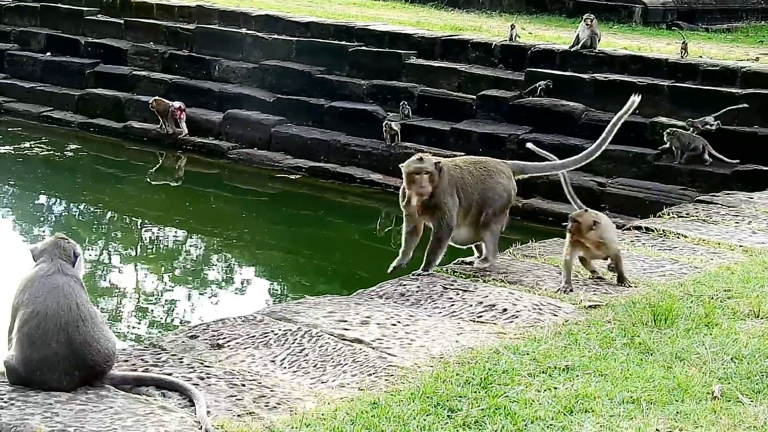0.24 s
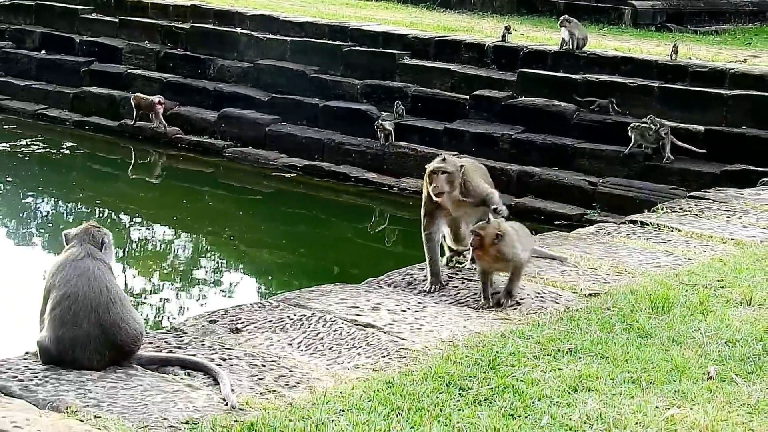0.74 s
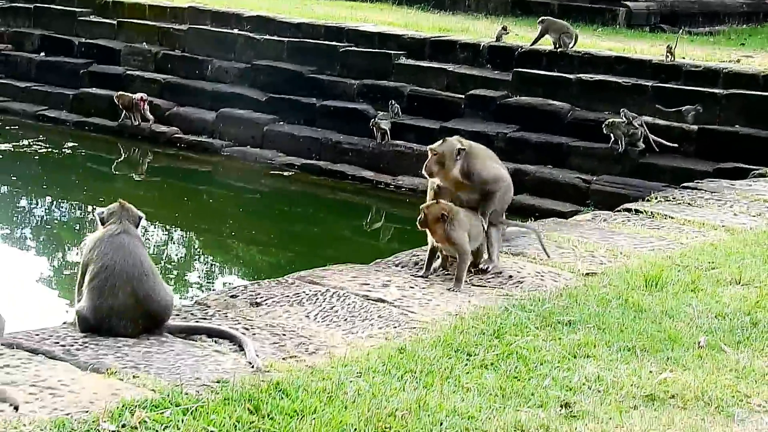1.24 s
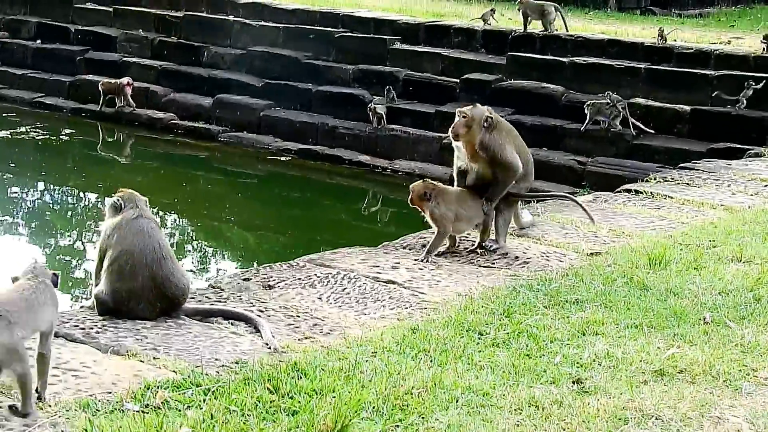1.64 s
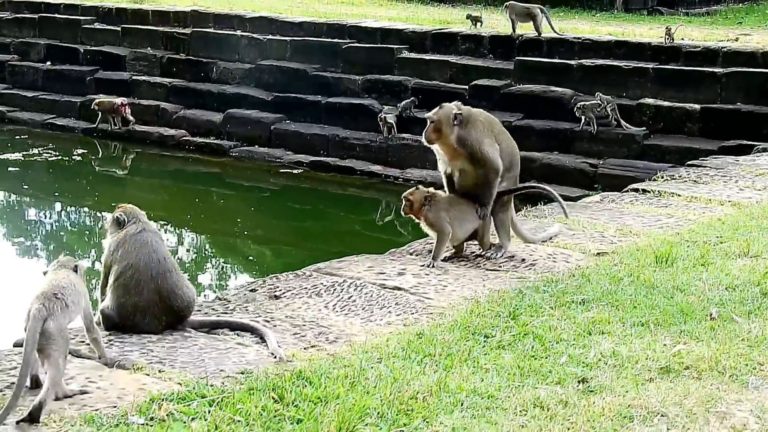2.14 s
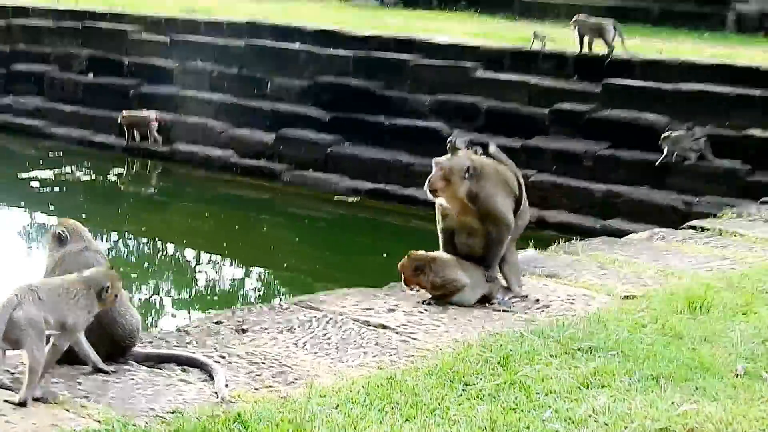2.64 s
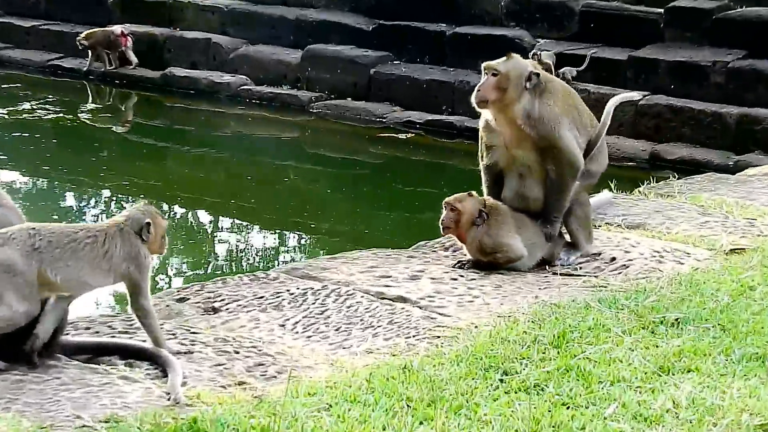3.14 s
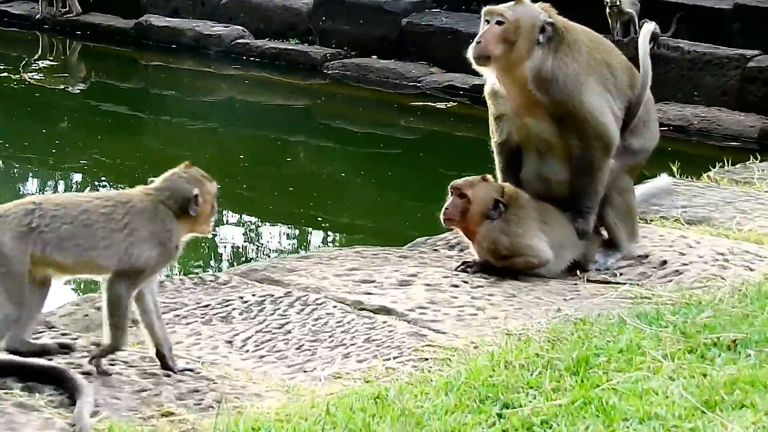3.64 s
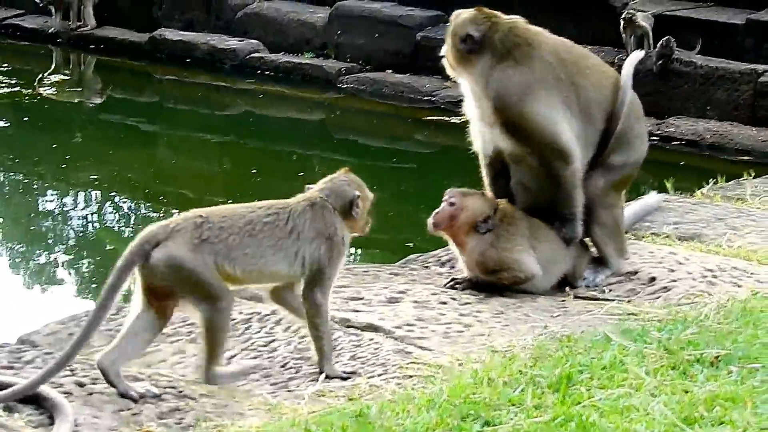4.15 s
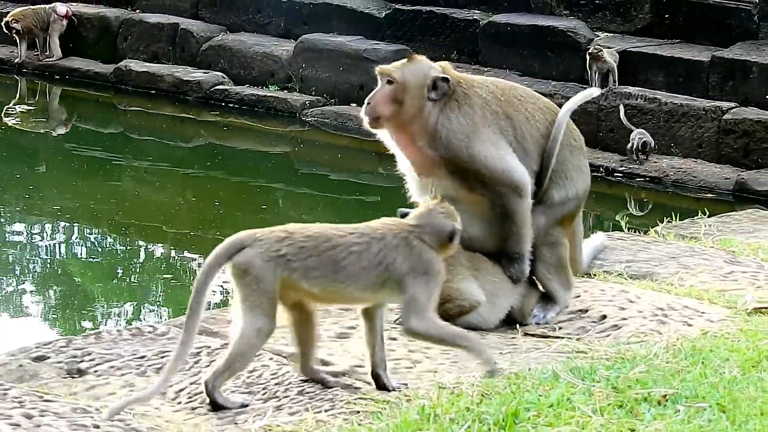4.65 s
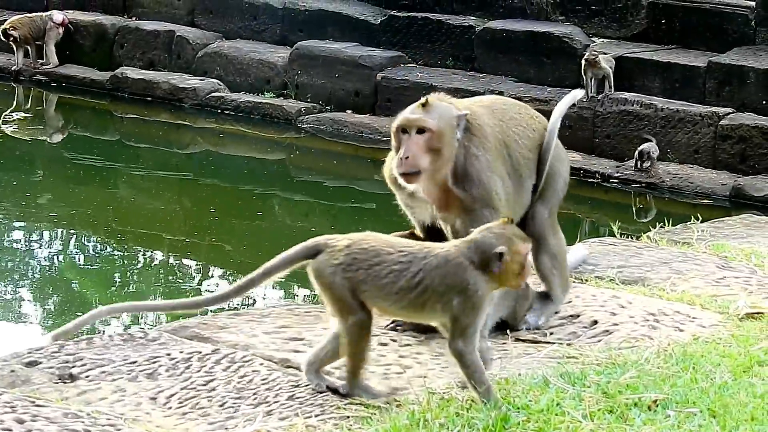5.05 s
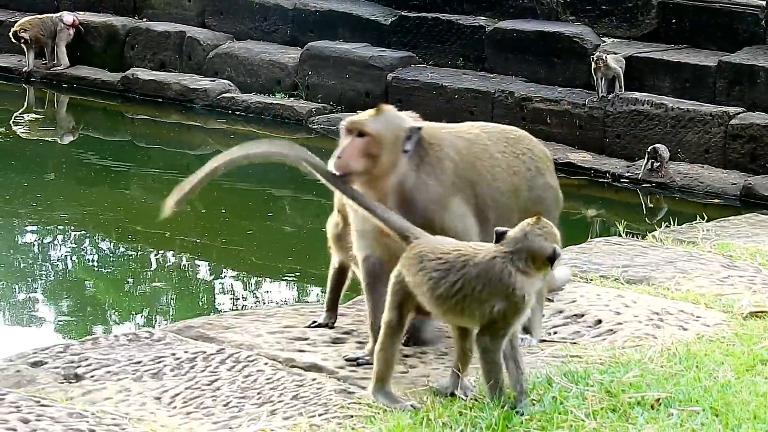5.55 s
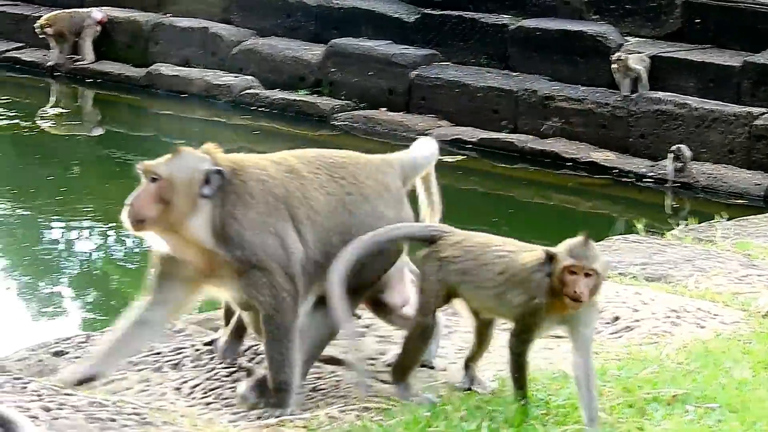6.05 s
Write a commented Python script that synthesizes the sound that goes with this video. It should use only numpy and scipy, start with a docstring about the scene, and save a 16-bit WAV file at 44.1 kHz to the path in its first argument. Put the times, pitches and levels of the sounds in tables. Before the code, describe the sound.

Piercing monkey shrieks break from clear whistles into raspy chaos outdoors, with gruff grunts between them and a faint echo off stone steps.

```python
"""A young macaque, held down by an adult on the stone rim of a pond, screams in bouts, close to dead ahead.
Its voice jumps between near-pure whistles and sliding squeals, both sums of gliding harmonics,
and harsh chaos, made of two torn noise bands; longer cries follow drawn contours of pitch and level.
Other macaques grunt, in noisy puffs over a chest rumble, and coo softly.
Paving nearby scatters the sound, and stone steps across the water send a faint echo back."""
import sys
import numpy as np
from scipy import signal
from scipy.fft import rfft, irfft, next_fast_len
from scipy.io import wavfile
from scipy.ndimage import uniform_filter1d, map_coordinates

SR = 44100
rng = np.random.default_rng(int(sys.argv[2]) if len(sys.argv) > 2 else 0)


def waveform_to_disk(signal):
    """Save audio, clipped to [-1, 1], as 16-bit WAV at the path in sys.argv[1]."""
    frames = np.transpose(np.atleast_2d(signal))
    scaled = np.clip(frames, -1, 1) * 32767
    samples = np.round(scaled).astype(np.int16)
    wavfile.write(sys.argv[1], SR, samples)


N = 276948
TIME = np.arange(N) / SR  # s
TOP_HZ = 15760  # upper limit of the microphone
CLEAN, ROUGH = 0.007, 0.04  # fast pitch shake of clear and of rough voices, as a share of the pitch
JITTER_RATE = 1800  # knots of that shake per second
EDGE_SHARE = 0.16  # softness of the edges of notes, cries and screams, as a share of their length


def amp(db):
    """Decibels to gain."""
    return 10 ** (np.asarray(db) / 20)


def unit(x):
    """Scale to rms 1."""
    return x / np.sqrt(np.mean(x ** 2) + 1e-20)


def along(points, hz):
    """Read (frequency [Hz], value) points on a log frequency axis."""
    f, v = np.transpose(points)
    return np.interp(np.log(hz + 1), np.log(f), v)


def wobble(rate, n=N):
    """A smooth random curve with rate knots a second."""
    knots = rng.standard_normal(int(n * rate / SR) + 4)
    return map_coordinates(knots, [np.arange(n) * rate / SR])


def filtered(x, response):
    """Multiply the spectrum of x by a response of frequency."""
    m = next_fast_len(N + SR // 4)
    return irfft(rfft(x, m) * response(np.fft.rfftfreq(m, 1 / SR)), m)[..., :N]


def noise(spectrum):
    """Noise of rms 1, coloured by (frequency [Hz], level [dB]) points."""
    return unit(filtered(rng.standard_normal(N), lambda hz: amp(along(spectrum, hz))))


def voice(pitch, tilt_db, jitter):
    """Harmonics of a shaking pitch through the throat; the more it shakes, the more its strength flutters."""
    # resonances of the throat: (frequency [Hz], level [dB])
    throat = [(400, -19), (1000, -9), (2100, -1), (2700, -12), (3300, -6), (4250, -14), (6100, 2),
              (8000, -7), (10500, -30), (15000, -46)]
    n = len(pitch)
    shake = 0.008 * wobble(60, n) + jitter * wobble(JITTER_RATE, n)
    phase = 2 * np.pi * np.cumsum(pitch * (1 + shake)) / SR
    order = np.arange(1, int(TOP_HZ / pitch.min()) + 2)[:, None]
    # every harmonic drifts in level on its own
    drift_db = 4.5 * np.array([wobble(35, n) for k in order])
    harmonic_hz = order * pitch
    weight = amp(along(throat, harmonic_hz) + tilt_db * np.log2(order) + drift_db)
    weight = weight * (harmonic_hz < SR / 2)
    start_phase = rng.uniform(0, 2 * np.pi, order.shape)
    wave = np.sum(weight * np.sin(order * phase + start_phase), 0)
    even_wave = wave / np.sqrt(np.sum(weight ** 2, 0) / 2)
    flutter_db = 2 * wobble(100, n) + 35 * jitter * wobble(JITTER_RATE / 2, n)
    return even_wave * amp(flutter_db)


def note(row, tilt_db, jitter):
    """One short note: the pitch glides along an arch while the level swells and sinks."""
    arch_octaves = 0.018  # upward bow of the pitch in mid-glide
    swell_db, crest = 4.5, 0.25  # climb to the peak and equal fall; place of the peak as a share of length
    start, length, first_hz, last_hz, peak_db = row
    # soft edges reach half a length beyond either end
    span = slice(*np.searchsorted(TIME, [start - length / 2, start + length + length / 2]))
    u = (TIME[span] - start) / length
    inside = np.clip(u, 0, 1)
    outside = np.abs(u - inside)
    # beyond the ends the glide goes on at half speed
    glide = first_hz * (last_hz / first_hz) ** ((u + inside) / 2)
    pitch = glide * 2 ** (arch_octaves * (1 - (2 * inside - 1) ** 2))
    level_db = peak_db - swell_db * np.interp(u, [0, crest, 1], [1, 0, 1]) ** 2
    fade = np.exp(-outside / EDGE_SHARE) * (1 - 2 * outside) ** 2
    out = np.zeros(N)
    out[span] = voice(pitch, tilt_db, jitter) * fade * amp(level_db)
    return out


def whistles(tilt_db=-14):
    """Tight vocal folds give an almost pure tone; tilt_db is per octave."""
    # whistled notes: (start [s], length [s], first pitch [Hz], last pitch [Hz], peak level [dB])
    whistle_notes = [(0.019, 0.2, 5990, 5400, -34), (0.232, 0.066, 5510, 4990, -27.5),
                     (0.309, 0.035, 4620, 4010, -25.5), (0.33, 0.021, 1930, 2080, -33.5),
                     (0.454, 0.0075, 6030, 7000, -28), (0.523, 0.028, 7670, 8230, -27.5),
                     (0.657, 0.022, 5100, 4800, -27), (0.66, 0.029, 2800, 2150, -35.5),
                     (0.783, 0.0055, 1928, 2210, -19), (0.827, 0.075, 5950, 5610, -25),
                     (1.428, 0.045, 6450, 5700, -28), (1.486, 0.051, 6980, 6430, -24.5),
                     (1.549, 0.23, 4830, 4560, -50.5), (1.769, 0.029, 1235, 2540, -41.5),
                     (1.923, 0.058, 6400, 5400, -43), (2.068, 0.53, 4790, 4680, -58.5),
                     (2.427, 0.044, 5450, 4260, -40.5), (2.839, 0.073, 6630, 6350, -22.5),
                     (2.929, 0.025, 6620, 5800, -24.5), (3.204, 0.041, 7050, 6270, -23.5),
                     (3.291, 0.077, 5850, 5300, -26.5), (3.405, 0.068, 2147, 2020, -24.5),
                     (2.321, 0.025, 3580, 3550, -43), (4.193, 0.0098, 5035, 5460, -24.5)]
    return sum(note(row, tilt_db, CLEAN) for row in whistle_notes)


def grunts(rate=80, scatter=0.72):
    """Slack folds flap unevenly; each noisy puff rings the muzzle over a low chest rumble."""
    # pulsed grunts: (start [s], length [s], muzzle level [dB], chest level [dB])
    grunt_calls = [(0.064, 0.26, -43.5, -49.5), (1.268, 0.13, -38.5, -43), (1.576, 0.55, -48, -51),
                   (2.658, 0.16, -33, -51), (2.913, 0.05, -35.5, -62.5), (3.284, 0.03, -35, -72.5),
                   (4.18, 0.14, -41, -53.5), (5.022, 0.15, -59, -74.5), (5.833, 0.19, -33.5, -45.5)]
    # resonances of the muzzle: (frequency [Hz], level [dB])
    muzzle = [(500, -16), (1050, -0.5), (1500, 7.5), (2750, -20.5), (3550, -6), (4600, -18.5),
              (6400, -13.5), (14000, -65)]
    # colour of the chest rumble: (frequency [Hz], level [dB])
    chest_colour = [(35, -39), (150, -10), (2500, -52.5)]
    pulse_decay_s, leak = 0.0035, 0.3  # the leak is air that flows between puffs
    flap_hz = rate * np.exp(scatter * wobble(rate))
    cycles = np.floor(np.cumsum(flap_hz) / SR)
    flaps = np.diff(cycles, prepend=0) * amp(5.7 * wobble(rate))
    puffs = signal.lfilter([1], [1, -np.exp(-1 / (pulse_decay_s * SR))], flaps) + leak
    breath = puffs * rng.standard_normal(N)
    rung = unit(filtered(breath, lambda hz: amp(along(muzzle, hz))))
    rumble, out = noise(chest_colour), np.zeros(N)
    for start, length, db, chest_db in grunt_calls:
        # the push of air builds quickly and sags away
        span = slice(*np.searchsorted(TIME, [start, start + 2 * length]))
        age = (TIME[span] - start) / length
        swell = (1 - np.exp(-6 * age)) ** 2 / (1 + age ** 10)
        out[span] += swell * (amp(db) * rung[span] + amp(chest_db) * rumble[span])
    return out


def squeals():
    """Rough notes sweep their harmonics through the throat."""
    # (start [s], length [s], first pitch [Hz], last pitch [Hz], peak level [dB], tilt [dB per octave])
    squeal_notes = [(0.303, 0.038, 952, 1235, -37.5, -3), (0.573, 0.028, 2570, 1706, -27.5, 2),
                    (0.754, 0.023, 1550, 1882, -27.5, -1), (0.789, 0.01, 1978, 2410, -22.5, 2),
                    (0.956, 0.049, 2844, 1590, -30.5, 0), (1.535, 0.089, 2335, 1943, -34, 8),
                    (2.009, 0.066, 3043, 1698, -45, -11), (2.964, 0.045, 2760, 2830, -33.5, -8),
                    (3.097, 0.026, 1290, 2357, -26.5, -14), (3.133, 0.1, 2446, 2570, -31.5, 3),
                    (3.94, 0.054, 3357, 3010, -32.5, -10.5), (3.963, 0.021, 2227, 3273, -21, 7),
                    (4.669, 0.041, 3910, 4190, -44.5, -8.5), (4.719, 0.03, 3785, 3160, -42.5, -22.5),
                    (6.175, 0.12, 468.4, 510.7, -43.5, -10.5)]
    return sum(note(row, tilt_db, ROUGH) for *row, tilt_db in squeal_notes)


def spell(start, length):
    """The folds tip into chaos, stay there, and settle quickly; long spells set in more gently."""
    attack_s, release_s = 0.0017 + EDGE_SHARE * length, 0.014
    span = slice(*np.searchsorted(TIME, [start, start + length + 10 * release_s]))
    age = TIME[span] - start
    out = np.zeros(N)
    out[span] = (1 - np.exp(-age / attack_s)) * np.exp(-np.maximum(age - length, 0) / release_s)
    return out


def chaos(flutter_db=1.0):
    """The folds lose their rhythm: a shrill band slides with throat tension over lurching low partials."""
    # spells of chaotic screaming: (start [s], length [s], shrill level [dB], low rasp level [dB])
    screams = [(0.303, 0.054, -42, -28), (0.367, 0.11, -41, -37), (0.493, 0.08, -29.5, -40),
               (0.575, 0.3, -35, -45.5), (0.757, 0.041, -37, -28), (0.816, 0.13, -38.5, -41.5),
               (0.922, 0.14, -30, -48), (0.967, 0.49, -32.5, -60), (1.45, 0.19, -51, -41.5),
               (1.993, 0.051, -60, -36.5), (2.235, 0.38, -60.5, -59.5), (2.721, 0.12, -43, -46),
               (3.037, 0.06, -29.5, -42), (3.101, 0.02, -23.5, -30.5), (3.117, 0.15, -37.5, -44.5),
               (3.298, 0.055, -33.5, -42.5), (3.355, 0.066, -26, -48.5), (3.464, 0.018, -30, -52.5),
               (3.561, 0.37, -67, -60.5), (3.958, 0.0047, -25.5, -32.5), (4.107, 0.078, -28, -45),
               (4.545, 0.084, -48, -57.5), (5.673, 0.15, -51, -82), (6.171, 0.079, -63, -43.5)]
    # centre of the shrill band, which rises as the throat tightens: (time [s], frequency [Hz])
    tension = [(0.33, 6699), (0.55, 7376), (1.0, 6530), (1.33, 7197), (2.0, 6425), (3.2, 7060),
               (4.17, 5944), (4.6, 7055), (5.75, 7750)]
    # shrill band at the resting tension: (frequency [Hz], level [dB])
    shrill = [(4300, -40.5), (5900, -8), (6600, 6), (7600, 4), (8600, -12.5), (14000, -43)]
    # low rasp before it lurches: (frequency [Hz], level [dB])
    rasp = [(350, -33.5), (2000, 3.5), (2650, -2), (3500, 9.5), (4300, -11), (5200, 9), (13000, -51)]
    rest_hz, patchy_db, lurch = 7000, 6, 0.14
    shrill_speed = np.interp(TIME, *np.transpose(tension)) / rest_hz * np.exp(ROUGH / 2 * wobble(60))
    rasp_speed = np.exp(lurch * wobble(35))
    powers = sum(np.outer(amp(levels_db) ** 2, spell(start, length) ** 2)
                 for start, length, *levels_db in screams)
    gains = np.sqrt(powers)
    out = 0
    for band, speed, gain in zip((shrill, rasp), (shrill_speed, rasp_speed), gains):
        z = signal.stft(noise(band), nperseg=256)[2]
        # each smeared partial is a few hundred hertz wide and lives some tens of milliseconds
        patches = uniform_filter1d(rng.standard_normal(z.shape), size=2, axis=0)
        patches = uniform_filter1d(patches, size=12, axis=1)
        torn = signal.istft(z * amp(patchy_db * unit(patches)), nperseg=256)[1]
        # reading the noise faster or slower slides its pitch
        sliding = map_coordinates(torn, [np.cumsum(speed)], mode="wrap")
        # the air supply holds the power of each band steady
        power = np.abs(uniform_filter1d(sliding ** 2, size=700))
        out = out + gain * sliding / np.sqrt(power)
    return out * unit(amp(flutter_db * (wobble(110) + wobble(700))))


def coos(tilt_db=-26):
    """Rounded lips leave mostly a husky fundamental; tilt_db is per octave."""
    # soft coos: (start [s], length [s], first pitch [Hz], last pitch [Hz], peak level [dB])
    coo_notes = [(3.873, 0.063, 943, 672, -44), (4.621, 0.074, 960, 911, -45),
                 (5.506, 0.068, 1000, 647, -54)]
    return sum(note(row, tilt_db, 2 * ROUGH) for row in coo_notes)


def cry(contour, tilt_db, jitter):
    """One long call that follows its contour of pitch and level, with rounded pitch corners and soft ends."""
    s, hz, db = np.transpose(contour)
    span = slice(*np.searchsorted(TIME, [s[0], s[-1]]))
    pitch = uniform_filter1d(np.interp(TIME[span], s, hz), size=500)
    level = amp(np.interp(TIME[span], s, db))
    ends = signal.windows.tukey(len(pitch), EDGE_SHARE)
    out = np.zeros(N)
    out[span] = voice(pitch, tilt_db, jitter) * level * ends
    return out


def cries(shriek_db=3, yelp_db=2, low_db=-10, moan_db=-30):
    """Pressed folds tilt shriek and yelp bright, slack ones the low call and moan soft (dB per octave)."""
    # contours of the drawn-out cries: (time [s], pitch [Hz], level [dB])
    shriek = [(3.98, 3125, -23.5), (4.02, 3142, -22.5), (4.045, 2926, -30), (4.054, 3170, -38.5),
              (4.1, 2994, -41)]
    low_call = [(4.42, 298.4, -69), (4.49, 393.8, -59), (4.67, 405.3, -50.5), (4.77, 330, -63.5)]
    moan = [(6.0, 979, -76), (6.1, 1110, -49), (6.155, 1180, -39.5), (6.2, 1116, -36), (6.23, 994, -50),
            (6.28, 1020, -33)]
    # a short yelp: (time [s], pitch [Hz], level [dB])
    yelp = [(5.24, 760, -64), (5.283, 1142, -43.5), (5.3, 1195, -29.5), (5.33, 1049, -35.5),
            (5.36, 798, -34), (5.405, 680, -49), (5.49, 734, -63.5)]
    # a thin falling whine, before it wavers: (time [s], pitch [Hz], level [dB])
    whine = [(5.435, 11490, -42), (5.452, 11300, -41.5), (5.5, 10100, -50), (5.532, 10120, -44),
             (5.57, 8950, -58.5), (5.6, 8800, -54), (5.634, 7820, -44), (5.68, 7440, -37)]
    bright = cry(shriek, shriek_db, CLEAN) + cry(yelp, yelp_db, ROUGH / 2)
    soft = cry(low_call, low_db, 2 * ROUGH) + cry(moan, moan_db, 2 * CLEAN)
    # the whine is one thin line that wavers in strength
    thin = cry(whine, 0, CLEAN) * unit(amp(3.5 * wobble(50)))
    return bright + soft + thin


def pond(x, near_db=-17, near_t60=0.3, far_db=-27, far_delay=0.069, far_t60=0.28, wide_hz=3000):
    """Scatter from the paving nearby, then a smeared echo from the far steps (times in s); treble is widest."""
    t = np.arange(SR // 2) / SR
    near = amp(-60 * t / near_t60)
    # the echo gathers up to its delay and dies away after it
    far = amp(-60 * np.abs(t - far_delay) / far_t60) * np.clip(t / far_delay, 0, 1) ** 2
    shape = amp(near_db) * near / np.linalg.norm(near) + amp(far_db) * far / np.linalg.norm(far)
    scatter = shape * rng.standard_normal((2, len(t)))
    wet = signal.fftconvolve(x[None], scatter, axes=1)[:, :N]

    def spread(hz):
        return np.array([np.ones_like(hz), hz / wide_hz]) / (1 + (hz / 9000) ** 4)

    mid, side = filtered(wet, spread)
    return np.array([mid + side, mid - side])


def scene(right_db=0.7):
    """The troop is almost straight ahead, a touch to the right, in quiet open air."""
    # colour of the open air: (frequency [Hz], level [dB])
    air = [(30, -20), (110, 0), (15000, -42)]
    troop = whistles() + grunts() + squeals() + chaos() + coos() + cries()
    hush = amp(-77) * noise(air)
    return troop * amp([[-right_db], [right_db]]) + pond(troop) + hush


def record(dry):
    """The camera's microphone keeps nothing above its band limit."""
    return filtered(dry, lambda hz: hz < TOP_HZ)


dry = scene()
out = record(dry)
waveform_to_disk(out)
```